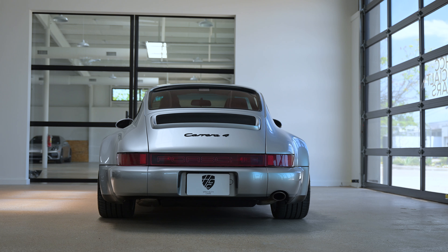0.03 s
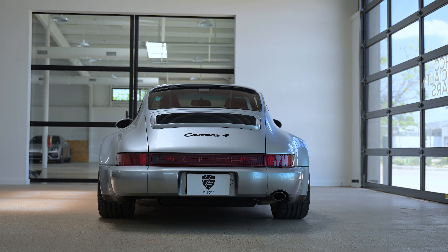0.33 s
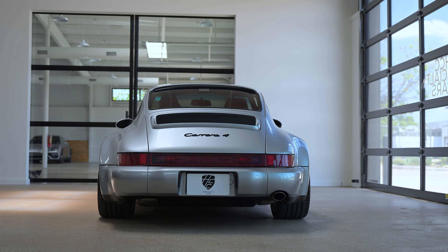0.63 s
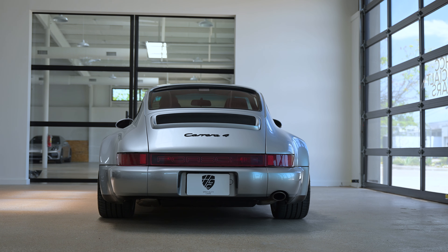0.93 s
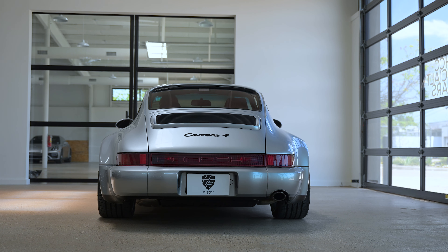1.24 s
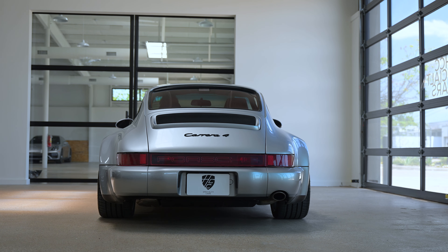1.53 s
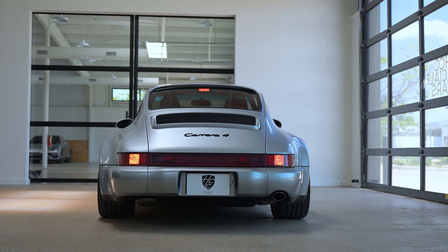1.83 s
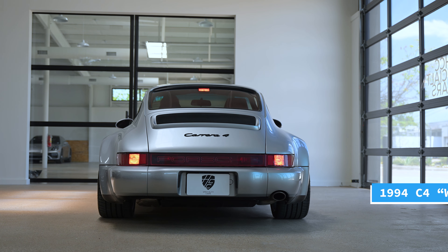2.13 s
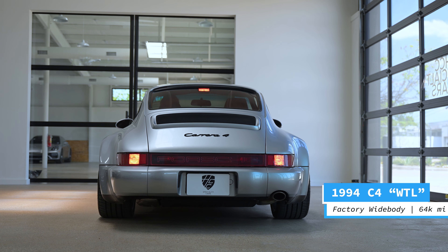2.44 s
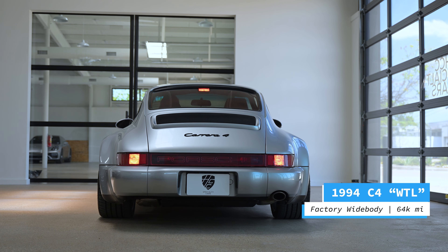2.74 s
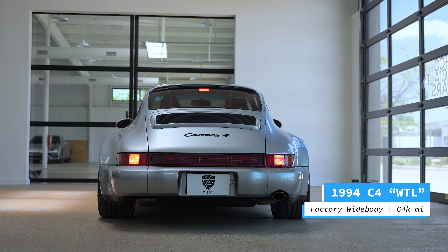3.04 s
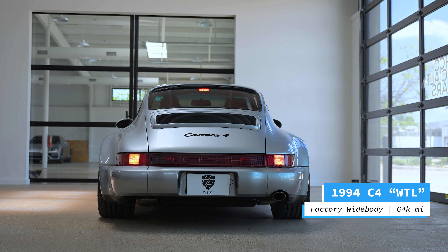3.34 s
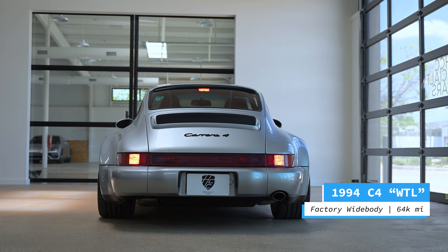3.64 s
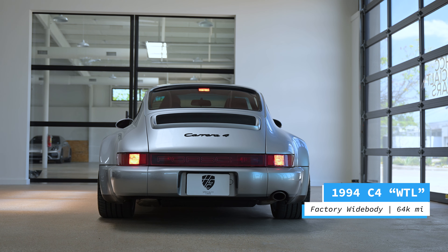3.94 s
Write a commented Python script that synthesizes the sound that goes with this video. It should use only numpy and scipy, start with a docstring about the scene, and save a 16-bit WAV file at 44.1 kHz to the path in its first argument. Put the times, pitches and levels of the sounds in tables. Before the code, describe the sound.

A sports car engine starts in a humming garage, heard from behind. A key clicks and a fuel pump whirrs faintly, then the starter cranks with a pulsing whine until the engine catches, flares and idles with a clatter.

```python
"""A six-cylinder sports car engine catches, flares up and settles to a clattery idle, almost in mono.
Each firing excites the resonances of the exhaust, while valves and chains strike the block.
Before that the key clicks, the fuel pump whirrs up, and the starter slams in and cranks,
its gear whine modulated by each compression. The car is heard from behind, in a humming garage."""
import sys
import numpy as np
from scipy import signal
from scipy.fft import rfft, irfft, next_fast_len
from scipy.io import wavfile
from scipy.ndimage import map_coordinates

SR = 44100
rng = np.random.default_rng(int(sys.argv[2]) if len(sys.argv) > 2 else 0)


def store_wav(level_fs):
    """Save 16-bit WAV to argv[1]."""
    pcm = np.round(np.clip(np.atleast_2d(level_fs), -1, 1) * 32767)
    wavfile.write(sys.argv[1], SR, pcm.T.astype(np.int16))


N = 176400
TIME = np.arange(N) / SR


def amp(db):
    """Decibels to amplitude ratio."""
    return 10 ** (np.asarray(db) / 20)


def unit(x):
    """Normalisation to rms 1."""
    return x / np.sqrt(np.mean(x ** 2) + 1e-20)


def along(points, hz):
    """Interpolation on a logarithmic frequency axis."""
    f, v = np.transpose(points)
    return np.interp(np.log(hz + 1), np.log(f + 1), v)


def curve(rows, axis=1):
    """Linear interpolation of one column over time."""
    cols = np.transpose(rows)
    return np.interp(TIME, cols[0], cols[axis])


def level(rows, axis=1):
    """Amplitude envelope of a dB curve, with Gaussian fades outside its span."""
    outside = np.maximum(rows[0][0] - TIME, 0) + np.maximum(TIME - rows[-1][0], 0)
    return amp(curve(rows, axis)) * np.exp(-(20 * outside) ** 2)


def wobble(rate):
    """Random modulation: a spline through `rate` knots a second."""
    return map_coordinates(rng.standard_normal(8192), [TIME * rate], mode="wrap")


def tone(hz):
    """A sinusoid whose phase is the integral of frequency."""
    return np.sin(2 * np.pi * np.cumsum(hz) / SR)


def filtered(x, response):
    """Linear filtering: the spectrum times a frequency response."""
    m = 2 * next_fast_len(N)
    return irfft(rfft(x, m) * response(np.fft.rfftfreq(m, 1 / SR)), m)[..., :N]


def coloured(x, points):
    """Minimum-phase filtering at unit power gain, falling 24 dB an octave below the first point."""
    def response(hz):
        octaves_below = np.log2(np.maximum(points[0][0] / (hz + 1), 1))
        gain = unit(amp(along(points, hz) - 24 * octaves_below))
        cepstrum = irfft(np.log(np.maximum(gain, 1e-6)))
        cepstrum[1:len(cepstrum) // 2] *= 2
        cepstrum[len(cepstrum) // 2 + 1:] = 0
        return np.exp(rfft(cepstrum))
    return filtered(x, response)


def resonate(x, modes):
    """Modal superposition: damped resonators of alternating sign."""
    return filtered(x, lambda f: sum(
        (-1) ** k * amp(db) * 1j * f * width / (hz * hz - f * f + 1j * f * width)
        for k, (hz, width, db) in enumerate(modes)))


def decaying(impulses, life_s):
    """Exponential damping of each impulse."""
    return signal.lfilter([1], [1, -np.exp(-1 / (life_s * SR))], impulses)


def knocks(events, colour, t60, attack_s):
    """Impact excitation: each contact is a dying noise burst with the spectrum of the struck part."""
    power = np.zeros(N)
    for s, db in events:
        age = np.maximum(TIME[:SR] - s % (1 / SR), 0)
        envelope = amp(db - 60 * age / t60) * (1 - np.exp(-age / attack_s))
        i = int(s * SR)
        power[i:i + SR] += envelope[:N - i] ** 2
    return coloured(np.sqrt(power) * rng.standard_normal(N), colour)


def impacts(rate_hz, life_s, jitter, scatter_db=0):
    """Quasi-periodic contacts: a train of noise bursts at rms 1, with jitter in periods."""
    noise, draws = rng.standard_normal(N), rng.standard_normal((8000, 2))
    at = ((np.arange(len(draws)) + jitter * draws[:, 0]) * SR / rate_hz).astype(int)
    keep = (at >= 0) & (at < N)
    sizes = amp(scatter_db * np.clip(draws[keep, 1], -2, 2))
    return unit(noise * decaying(np.bincount(at[keep], sizes, N), life_s))


# Garage decay (frequency [Hz], reverberation time [s])
ROOM_T60 = [(1000, 0.79), (14000, 0.64)]

def garage(x, wet_db):
    """Reverberation: power is shared between direct sound and a decaying tail from hard walls."""
    hz, t, spectra = signal.stft(rng.standard_normal(SR // 2), SR, nperseg=256)
    tail = signal.istft(spectra * amp(-60 * t / along(ROOM_T60, hz)[:, None]), SR, nperseg=256)[1]
    wet = signal.fftconvolve(x, np.pad(tail, (SR // 200, 0)))[:N]
    return (x + amp(wet_db) * unit(wet) * np.std(x)) / np.sqrt(1 + amp(2 * wet_db))


# Machinery partials (frequency [Hz], relative level [dB])
HUM_PARTIALS = [(123.8, -54.5), (188.4, -64), (215.3, -65), (279.9, -65), (312.2, -62), (527.6, -69),
                (651.4, -63), (818.3, -70), (1109, -70.5), (1195, -72.5)]
# Moving air (frequency [Hz], relative level [dB])
AIR_SPECTRUM = [(55, -4), (126, 0), (313, -4.5), (650, -12), (1200, -15.5), (3400, -24.5), (4300, -23.5),
                (6400, -33), (15500, -35.5)]

def garage_hum():
    """A line spectrum from slightly unsteady machines lies over the broadband noise of moving air."""
    hum = 0
    for hz, db in HUM_PARTIALS:
        gain = amp(db + 1.8 * wobble(9))
        hum += gain * np.sin(2 * np.pi * (hz * TIME + rng.random()) + 0.23 * wobble(3.05))
    return amp(3) * hum + amp(-54) * unit(coloured(rng.standard_normal(N), AIR_SPECTRUM))


# Key clicks, and the burst of brush noise as the pump starts (time [s], level [dB])
KEY_CLICKS = [(.3275, -44), (.356, -54)]
PUMP_BRUSH_BURST = [(.447, -44)]
# Their spectra (frequency [Hz], relative level [dB])
KEY_SPECTRUM = [(1900, -3), (2650, -0.5), (4600, -9), (10000, -12.5), (15500, -24)]
PUMP_BRUSH_SPECTRUM = [(4000, -3), (15500, -11)]

def key_and_pump_start():
    """Impact transients: the key clicks, then the fuel pump's brushes hiss briefly as it starts."""
    key = knocks(KEY_CLICKS, KEY_SPECTRUM, t60=0.075, attack_s=0.0012)
    return key + knocks(PUMP_BRUSH_BURST, PUMP_BRUSH_SPECTRUM, t60=0.075, attack_s=0.001)


# Small motor's tone (time [s], frequency [Hz], level [dB])
SERVO_GLIDE = [(.34, 3370, -67), (.4, 3880, -69)]

def servo():
    """Pitch follows rotation speed: a small motor runs up after the first key click."""
    return tone(curve(SERVO_GLIDE)) * level(SERVO_GLIDE, axis=2) * (TIME > KEY_CLICKS[0][0])


PUMP_START_S, PUMP_HZ, SPINUP_S, PUMP_RISE_S, SURGE_S = 0.445, 1060, 0.01, 0.008, 0.031
# Pump partials (frequency [multiple of the pump's], relative level [dB])
PUMP_PARTIALS = [(2, -68), (3, -68), (4, -66), (5, -70.5), (6, -71), (7.4, -68), (9, -70.5)]

def fuel_pump():
    """Rotational orders surge, then fade as pressure builds; the highest go first, dulling the whirr."""
    age = np.maximum(TIME - PUMP_START_S, 0)
    pitch = PUMP_HZ * (1 - 0.28 * np.exp(-age / SPINUP_S)) * (1 + 0.0096 * wobble(400))
    whirr = 0
    for order, db in PUMP_PARTIALS:
        fade_db_per_s = 11.54 + 0.6923 * order ** 2
        whirr += amp(db + 2.8 * wobble(50.2) - fade_db_per_s * age) * tone(order * pitch)
    surge_db = 14 * np.exp(-(2 * age / SURGE_S - 2) ** 2)
    return whirr * (1 - np.exp(-age / PUMP_RISE_S)) * amp(surge_db)


# Plunger and pinion contacts (time [s], level [dB])
PLUNGER_CLICKS = [(1.903, -40.5), (1.92, -47)]
PINION_SLAMS = [(1.944, -26), (1.955, -20), (1.979, -20.5), (1.988, -23.5)]
# Their spectra (frequency [Hz], relative level [dB])
PLUNGER_SPECTRUM = [(200, -34), (2000, 1.5), (4200, -6), (6000, -15), (15500, -31)]
PINION_SPECTRUM = [(105, -23), (200, -4.5), (519, -3), (700, -6), (1550, -10), (3770, -12.5), (4660, -23.5),
                   (5280, -17.5), (15500, -35)]

def starter_engagement():
    """Impact transients: the solenoid plunger clicks and the pinion hits the ring gear."""
    plunger = knocks(PLUNGER_CLICKS, PLUNGER_SPECTRUM, t60=0.072, attack_s=0.0006)
    return plunger + knocks(PINION_SLAMS, PINION_SPECTRUM, t60=0.065, attack_s=0.00054)


STROKE_HZ, LOAD_PEAK_S, LOAD_FROM_S, LOAD_RISE_S = 9.9, 2.492, 2.1, 0.3
# Cranking envelope (time [s], level [dB])
CRANK_LEVEL = [(1.94, -52), (1.97, -31), (2.12, -37), (2.26, -34.5), (2.42, -37.5), (2.5, -36),
               (3.2, -35.5), (3.55, -40.5)]
# Tooth contacts (frequency [Hz], relative level [dB])
GEAR_SPECTRUM = [(110, -10.5), (314, -0.5), (400, -2.5), (574, -10.5), (682, -1), (1120, -6), (1580, -8.5),
                 (2540, -12), (3400, -7.5), (7290, -24.5), (15500, -40)]
# Starter housing (frequency [Hz], bandwidth [Hz], relative level [dB])
HOUSING_MODES = [(335, 70, 4), (900, 56, 0), (1640, 50, 7)]

def starter_grind():
    """Forced vibration: gear teeth drive the housing, amplitude-modulated by the compression load."""
    hold = np.clip((TIME - LOAD_FROM_S) / LOAD_RISE_S, 0, 1)  # the compressions take hold
    load_db = 3.1 * hold * np.cos(2 * np.pi * STROKE_HZ * (TIME - LOAD_PEAK_S))
    teeth = impacts(rate_hz=418, life_s=0.003, jitter=0.25, scatter_db=0.5)
    growl = np.sqrt(hold) * amp(load_db - 8.5) * unit(resonate(teeth, HOUSING_MODES))
    grind = unit(coloured(teeth, GEAR_SPECTRUM)) + growl
    return unit(grind) * level(CRANK_LEVEL) * amp(load_db)


SPEED_PEAK_S, WHINE_SAG, WHINE_ROUGHNESS = 2.468, 0.06, 0.014
# Armature gear (time [s], frequency at full speed [Hz], mean level [dB])
MESH_TONE = [(2.46, 3200, -45), (2.57, 3305, -45), (3.1, 3300, -43), (3.25, 3290, -49)]

def starter_whine():
    """Frequency modulation: two gear-mesh tones sag and weaken as each compression slows the starter."""
    speed = np.cos(2 * np.pi * STROKE_HZ * (TIME - SPEED_PEAK_S))
    sag = WHINE_SAG * ((1 - speed) / 2) ** 2
    pitch = curve(MESH_TONE) * (1 - sag + WHINE_ROUGHNESS * wobble(270))
    gain = level(MESH_TONE, axis=2) * amp(3.5 * speed + 2 * wobble(60))
    return gain * (tone(pitch) + amp(-12) * tone(1.6 * pitch))


# Single valve contacts, and the envelope of their rattle (time [s], level [dB])
VALVE_TICKS = [(2.2982, -40), (2.347, -37.5), (2.4105, -40), (2.4609, -39.5), (2.518, -37), (2.5626, -39),
               (2.626, -37), (2.6639, -38), (2.7308, -40), (2.7667, -40), (2.825, -35.5), (2.8669, -40),
               (2.9278, -36), (2.9742, -37.5), (3.02, -40), (3.065, -37), (3.1144, -39.5), (3.157, -35.5),
               (3.208, -29), (3.267, -27.5), (3.364, -27.5), (3.468, -29), (3.493, -30), (3.514, -31),
               (3.63, -38), (3.6696, -34), (3.7155, -35), (3.7564, -38), (3.822, -44), (3.8911, -36.5),
               (3.96, -37)]
RATTLE_LEVEL = [(3.24, -44), (3.3, -33), (3.38, -29), (3.44, -32.5), (3.51, -44), (3.56, -47), (4, -51)]
# Spectrum of both (frequency [Hz], relative level [dB])
VALVE_SPECTRUM = [(1300, 2.5), (4000, 6.5), (6500, -3), (8500, 1), (10200, -3.5), (12000, -4.5),
                  (15500, -11.5)]

def valve_gear(beat):
    """Brief metal contacts radiate treble: returns separate ticks and a dense rattle."""
    ticks = knocks(VALVE_TICKS, VALVE_SPECTRUM, t60=0.14, attack_s=0.0014)
    contacts = impacts(rate_hz=330, life_s=0.009, jitter=0.5, scatter_db=4) * beat
    return ticks, unit(coloured(contacts, VALVE_SPECTRUM)) * level(RATTLE_LEVEL)


CLATTER_HZ = 899.7
# Clatter envelope (time [s], level [dB])
CLATTER_LEVEL = [(3.19, -42), (3.22, -36.5), (3.3, -30.5), (3.38, -26.5), (3.44, -27.5), (3.51, -29.5),
                 (3.59, -33), (3.75, -31.5), (4, -33)]
# Valve and chain contacts (frequency [Hz], relative level [dB])
CLATTER_SPECTRUM = [(130, -27.5), (225, -0.5), (422, -6), (471, -3), (585, -5.5), (1590, -9), (2650, -13),
                    (2960, -6), (4050, -9.5), (5910, -20), (15500, -34.5)]
# Engine block (frequency [Hz], bandwidth [Hz], relative level [dB])
BLOCK_MODES = [(1305, 30, -4), (1630, 24, 3.5), (2116, 24, -2), (3008, 90, -2.5), (3620, 180, -4)]

def block_clatter(beat):
    """Structure-borne sound: valves and chains strike the block and excite its modes."""
    taps = impacts(CLATTER_HZ, life_s=0.0036, jitter=0.6) * beat
    sharp_taps = impacts(CLATTER_HZ, life_s=0.0012, jitter=0.42) * beat
    ring = amp(-7.5) * unit(resonate(sharp_taps, BLOCK_MODES))
    return unit(unit(coloured(taps, CLATTER_SPECTRUM)) + ring) * level(CLATTER_LEVEL)


def flare_ring(peak_s=3.365, half_width_s=0.06, hz=3003):
    """Narrow-band resonance: metal rings in a brief, wavering swell as the engine flares."""
    swell = np.exp(-((TIME - peak_s) / half_width_s) ** 2)
    return amp(-32.5 + 3.4 * wobble(90)) * swell * tone(hz + 20 * wobble(200))


# Engine speed (time [s], firing rate [Hz])
FIRING_RATE = [(3.2, 20.8), (3.28, 38), (3.36, 60.3), (3.44, 59), (3.6, 46), (4, 45.4)]

def firing_count():
    """Phase is the integral of rate: it advances by one at each firing."""
    return np.cumsum(curve(FIRING_RATE) * (TIME > FIRING_RATE[0][0])) / SR


PUFF_TILT = [(45, 0), (250, 3), (1500, -22)]  # (frequency [Hz], relative level [dB])
# Uneven strength round the firing order (relative level [dB])
CYLINDER_LEVELS = [3, -4, 2, -6, 4, -2]
# Exhaust pipe (frequency [Hz], bandwidth [Hz], relative level [dB])
PIPE_MODES = [(47, 22, -4), (69, 20, -3.5), (98, 20, -1), (128, 22, -3.5), (235, 22, -4)]
# Exhaust envelope (time [s], level [dB])
EXHAUST_LEVEL = [(3.2, -68), (3.3, -35), (3.36, -37), (3.415, -26.5), (3.46, -38), (3.6, -44),
                 (3.66, -34.5), (4, -36.5)]

def exhaust(firings):
    """Pulse excitation of an air column: one noisy puff per firing rings the pipe's modes."""
    at = np.flatnonzero(np.diff(np.floor(firings)) > 0)
    sizes = amp(np.resize(CYLINDER_LEVELS, len(at)) + 2 * rng.standard_normal(len(at)))
    puffs = decaying(np.bincount(at, sizes, N), life_s=0.0058) * (1 + 0.89 * wobble(900))
    pipe = coloured(resonate(puffs, PIPE_MODES), PUFF_TILT)
    return pipe / np.std(pipe[at[0]:]) * level(EXHAUST_LEVEL)


# Stereo width (frequency [Hz], side level relative to mid [dB])
SIDE_SPECTRUM = [(4500, -67), (9000, -14), (14000, -11.5)]

def scene():
    """Superposition, almost in mono: only the top treble scatters differently to left and right."""
    mid = garage_hum() + garage(key_and_pump_start() + servo() + fuel_pump(), wet_db=0)
    mid += garage(starter_engagement() + starter_grind(), wet_db=-4) + starter_whine()
    firings = firing_count()
    beat = amp(np.cos(2 * np.pi * firings))  # swings 1 dB each way with every firing
    ticks, rattle = valve_gear(beat)
    mid += garage(ticks, wet_db=-3.5) + garage(block_clatter(beat) + rattle, wet_db=-7)
    mid += flare_ring() + exhaust(firings)
    scatter = rng.standard_normal(256)
    diffuse = signal.fftconvolve(mid, scatter / np.linalg.norm(scatter))[:N]
    side = filtered(diffuse, lambda hz: amp(along(SIDE_SPECTRUM, hz)))
    return np.array([mid + side, mid - side])


START_S, LOW_CUT_HZ, TOP_HZ = 0.058, 40, 15800

def record(dry):
    """Gating and band limiting: an abrupt start, a steep low cut and a sharp upper limit."""
    gated = dry * (TIME > START_S)
    return filtered(gated, lambda hz: (hz < TOP_HZ) / np.sqrt(1 + (LOW_CUT_HZ / (hz + 1)) ** 20))


dry = scene()
out = record(dry)
store_wav(out)
```